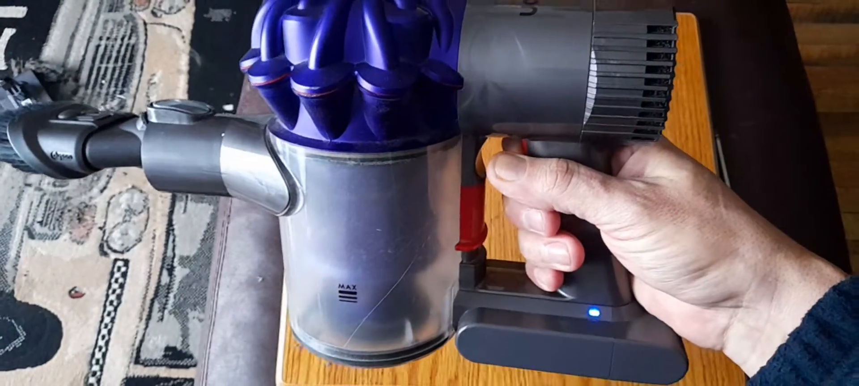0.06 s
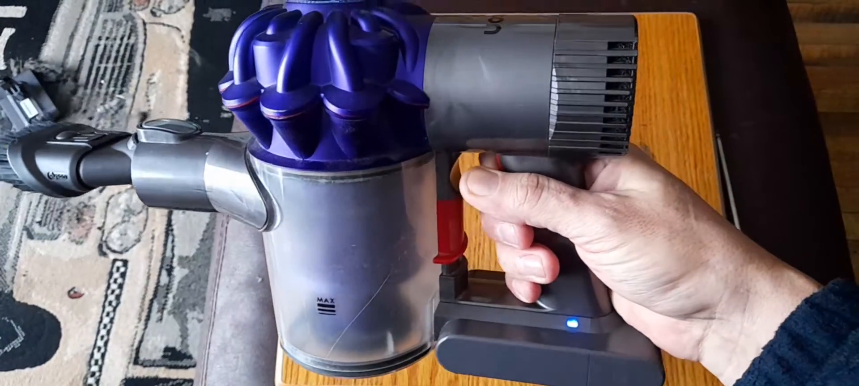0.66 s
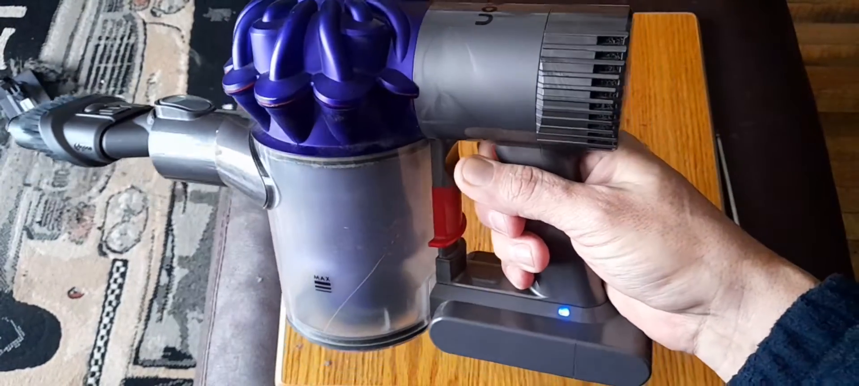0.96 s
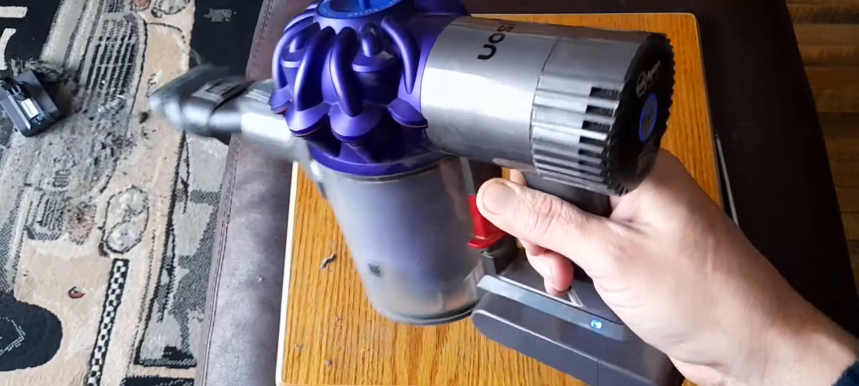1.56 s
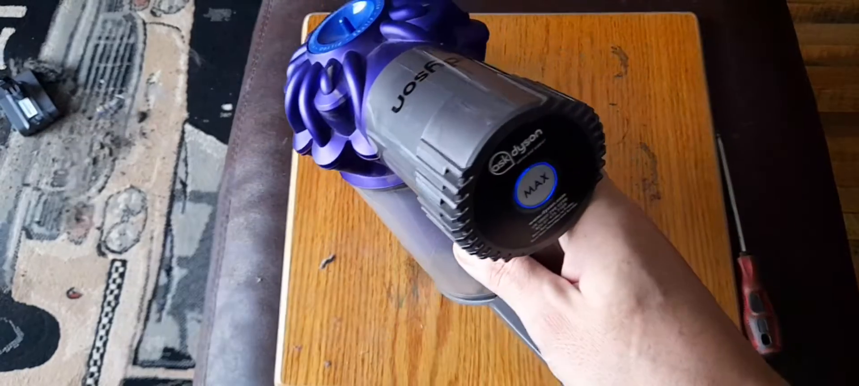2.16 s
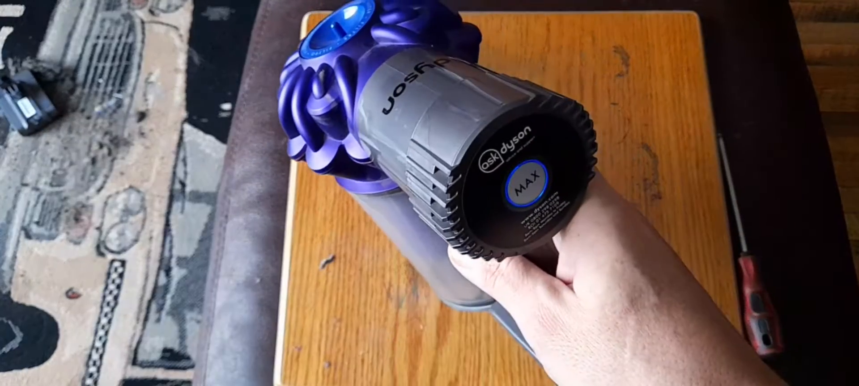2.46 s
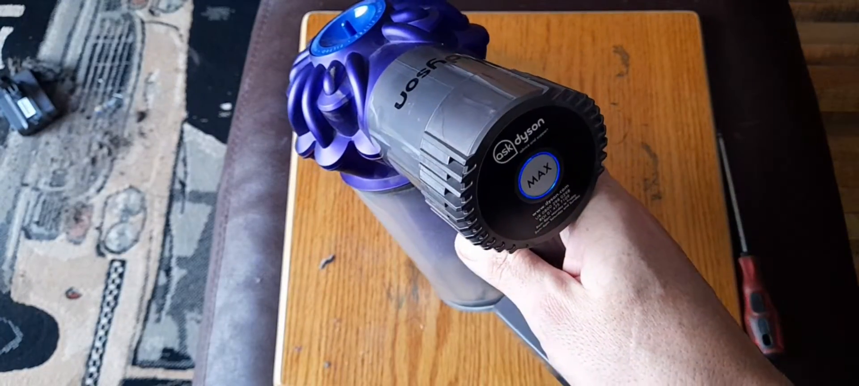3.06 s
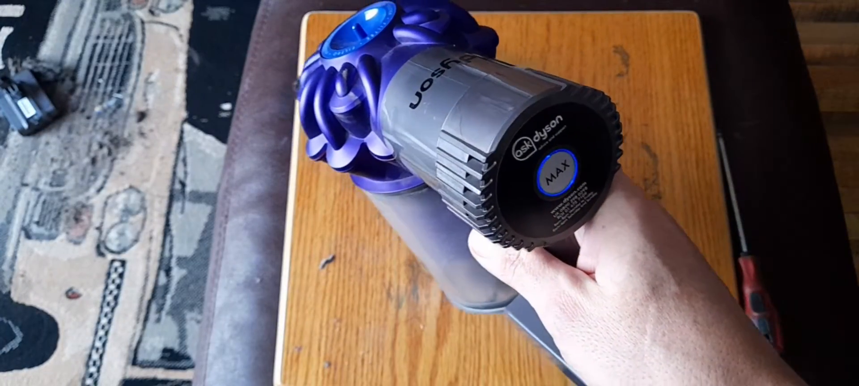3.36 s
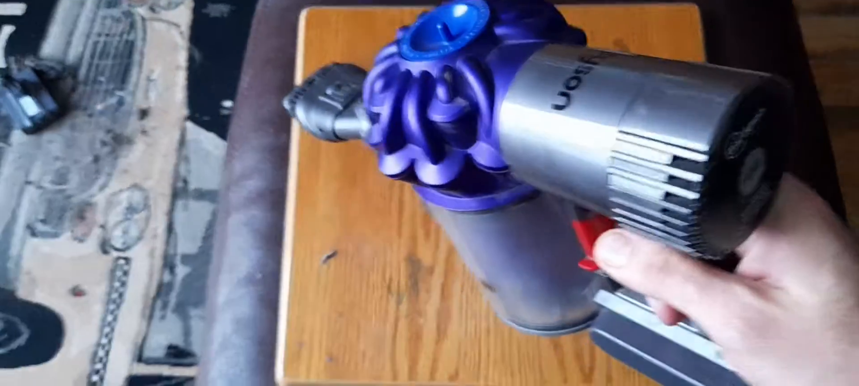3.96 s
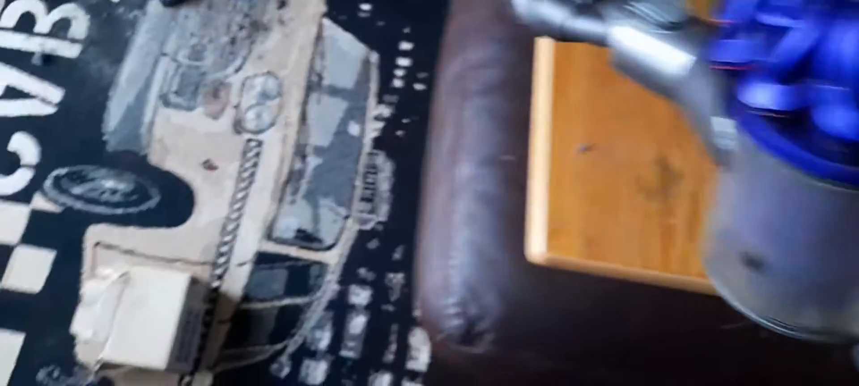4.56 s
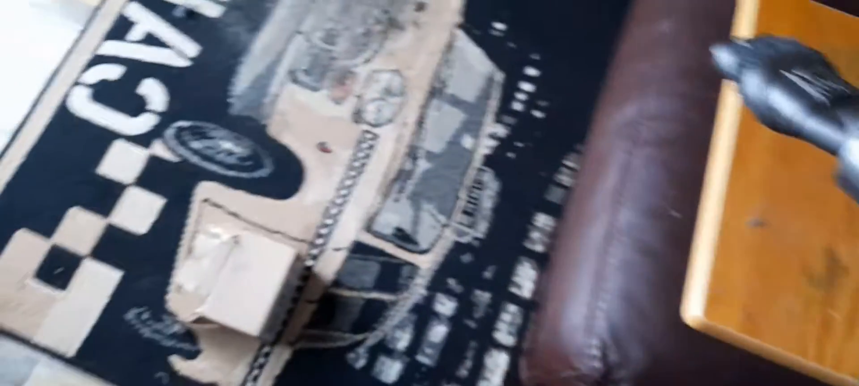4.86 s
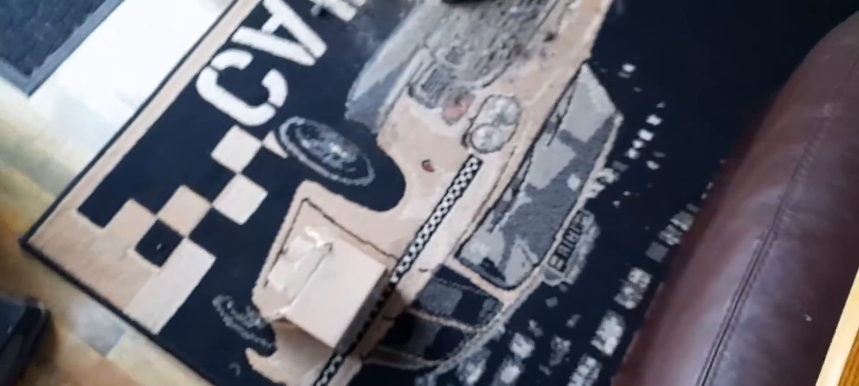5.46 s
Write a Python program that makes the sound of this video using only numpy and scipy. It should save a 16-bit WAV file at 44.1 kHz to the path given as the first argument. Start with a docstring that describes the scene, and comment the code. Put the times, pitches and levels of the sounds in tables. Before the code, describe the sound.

A handheld cordless vacuum runs close by with rushing air and a high whine, then switches off and spins down with small plastic knocks.

```python
"""Cordless vacuum coasting to rest

A handheld vacuum runs close by: turbulent air rushes, the fast motor whines at harmonics of its shaft
rate, and at first the exhaust buffets the right microphone. It is turned round and the trigger is let
go; drag and friction brake the rotor, with a falling tone and a short rattle. At last the magnet
catches the rotor, which rocks with a low buzz while the plastic body knocks."""
import sys
import numpy as np
from scipy import signal
from scipy.fft import rfft, irfft, next_fast_len
from scipy.io import wavfile
from scipy.ndimage import map_coordinates

SR = 44100
rng = np.random.default_rng(int(sys.argv[2]) if len(sys.argv) > 2 else 0)


def materialize(psi):
    """Save the field psi as 16-bit PCM at rate SR to the path in sys.argv[1].

    A 1-D psi becomes a single channel; in a 2-D psi each row is a channel.
    """
    bounded = np.clip(np.atleast_2d(psi).T, -1, 1)
    quanta = np.round(bounded * 32767).astype(np.int16)
    wavfile.write(sys.argv[1], SR, quanta)


N = 242814

RUN_HZ, RELEASE_S, CATCH_S = 1554, 3.614, 5.32  # full shaft speed, trigger let go, rotor caught

# Spectra of the duct roar, hollow bin, vent hiss, fine hiss and top fizz: frequency_hz, level_db
DUCT_SPECTRUM = [(30, -36.5), (80, -26), (160, -14.5), (300, -10.5), (480, -10), (720, -6.5), (1000, -5),
                 (1400, 0.5), (1900, 1), (2150, -3), (2400, -6), (2650, -10.5), (3400, -29.5),
                 (5700, -89.5)]
BIN_SPECTRUM = [(30, -16.5), (60, -17.5), (100, -10), (160, -6.5), (250, -2), (360, 1.5), (560, -6.5),
                (850, 1.5), (1050, -14.5), (1500, -29)]
VENT_SPECTRUM = [(1410, -46.5), (2400, -9), (3080, -1), (3420, -2.5), (3910, 0.5), (4300, -3), (5070, -1.5),
                 (5930, -4), (6000, -1.5), (7800, -38), (13200, -120)]
HISS_SPECTRUM = [(5200, -37.5), (6200, -3.5), (7000, -1), (8300, 0.9), (9800, 0.8), (11000, -1.5),
                 (12000, -7.5), (13000, -23), (15800, -33)]
FIZZ_SPECTRUM = [(10500, -28), (12000, -3), (14000, 1.5), (15800, -2)]
# Fine hiss at full flow: time_s, level_db
HISS_LEVEL = [(0, -32), (.5, -30.5), (1.15, -25.5), (1.45, -26.5), (1.77, -24), (1.89, -28.5), (2.2, -25.5),
              (3.27, -26), (3.6, -29.5)]
# Turning of the vacuum in the hand: time_s, angle_deg
HEADING = [(0, 3.5), (.7, 13.5), (1.45, 11), (1.7, 32), (2.05, 46), (2.7, 60), (3.3, 48.5), (3.6, 42.5)]
def airflow(speed):
    """Turbulent noise follows a power law of the flow, which lags behind the motor speed."""
    lag_s = 0.1
    keep = np.exp(-1 / (lag_s * SR))
    flow = 1 - signal.lfilter([1 - keep], [1, -keep], 1 - speed / RUN_HZ)
    octaves = np.log2(np.maximum(flow, 1e-3))  # each factor on this is dB lost as the flow halves
    hiss_db, = curves(HISS_LEVEL)
    hiss_dip_db = hiss_db - hiss_db.max()
    duct_db = -34.5 + 0.0823 * curves(HEADING)[0] + 14.5 * octaves
    duct_dip_db = duct_db - duct_db.max()
    vent_db = -27 + 0.54 * (hiss_dip_db + 2) + 16 * octaves
    duct = amp(duct_db) * turbulence(DUCT_SPECTRUM, ring=0.48, echo_db=-10)
    # the bin and the housing fade more slowly than the roar
    hollow = amp(-47 + .5 * duct_dip_db) * turbulence(BIN_SPECTRUM, ring=0.83, echo_db=-9)
    housing_modes = [(1855, 110, -2.5), (2850, 91, -3)]
    housing = unit(filtered(rng.standard_normal((2, N)), lambda hz: peaks(hz, housing_modes)))
    housing *= amp(-44.5 + .68 * duct_dip_db)
    vent = amp(vent_db) * turbulence(VENT_SPECTRUM, ring=.4, echo_db=-11)
    hiss = amp(hiss_db + 17.5 * octaves) * turbulence(HISS_SPECTRUM, ring=.1, echo_db=-9)
    fizz = amp(-30.5 + .37 * hiss_dip_db + 21 * octaves) * noise(FIZZ_SPECTRUM)
    return (duct + hollow + housing + vent + hiss + fizz) * amp(0.34 * wobble(25))


# Resonances of the bin and ducts: centre_hz, width_hz, level_db
CAVITY_MODES = [(533, 42, -0.5), (660, 31, 3.5), (800, 110, -1.5), (960, 70, -10.5), (1786, 110, -5.5),
                (1940, 80, -6), (2790, 110, -3), (2936, 70, -21), (3870, 150, -9.5), (4590, 200, 3),
                (5050, 250, -4)]
# Likeness of the air noise at the two microphones: frequency_hz, coherence
AIR_COHERENCE = [(60, 0.07), (99, 0.19), (160, 0.6), (270, 0.76), (450, 0.92), (740, 0.78), (1220, 0.75),
                 (2010, 0.81), (3330, 0.27), (5500, 0.43), (9080, -0.01), (15000, -0.12)]
# Balance of the air noise: frequency_hz, left_minus_right_db
AIR_BALANCE = [(60, 4), (110, -0.5), (200, 2), (380, -2), (700, 1.5), (1290, -1), (2380, -1.5),
               (4400, -1.5), (8120, 0.5), (15000, -5)]
def turbulence(spectrum, ring, echo_db):
    """Cavity resonance colours broadband noise, which is partly coherent at the two microphones."""
    def mid_side_response(hz):
        coherence = np.clip(along(AIR_COHERENCE, hz), -.95, .98)
        side_gain = np.tan(np.arccos(coherence) / 2)
        return resonant(hz, CAVITY_MODES, ring) * np.array([np.ones_like(hz), side_gain])

    source = reflected(noise(spectrum), echo_db, t60=0.099)
    mid, side = filtered(source, mid_side_response)
    pair = np.array([mid + side, mid - side])
    return filtered(pair, lambda hz: amp(np.outer([.5, -.5], along(AIR_BALANCE, hz)))) / np.std(mid)


# The shaft starts slightly fast and settles: time_s, excess_hz
OVERSPEED = [(0, 6), (1.35, 4.5), (1.8, 1.5), (2.35, .3), (3.2, 0)]
def shaft():
    """Air drag and constant bearing friction brake the released rotor; gives speed (Hz), angle (rad)."""
    friction_hz_per_s, drag_hz_per_s, drag_exponent = 188.4, 9324, 2.124
    speeds, step = np.linspace(RUN_HZ, 0, N, retstep=True)
    braking = friction_hz_per_s + drag_hz_per_s * (speeds / RUN_HZ) ** drag_exponent
    reached_s = RELEASE_S + np.cumsum(-step / braking)
    speed = np.interp(clock(), reached_s, speeds) + curves(OVERSPEED)[0]
    return speed, 2 * np.pi * np.cumsum(speed * (1 + .0003 * wobble(30))) / SR


# Pole-passing and blade-passing tones under power: time_s, left_db, right_db
POLE_LEVEL = [(0, -28.5, -48.5), (.55, -26, -33.5), (.85, -27.5, -32.5), (1.2, -24, -29.5),
              (1.52, -31.5, -33), (1.7, -22.5, -33.5), (1.87, -27.5, -30.5), (2.05, -27, -31),
              (2.4, -34, -33), (3.6, -29.5, -31.5)]
BLADE_LEVEL = [(0, -24.5, -27.5), (.45, -27, -47), (.85, -41, -39.5), (1.05, -38.5, -28.5),
               (1.32, -35.5, -28.5), (1.48, -18.5, -40), (1.73, -43.5, -22.5), (1.9, -20.5, -22),
               (2.12, -36, -27.5), (2.22, -25, -27.5), (2.9, -32, -28.5), (3.33, -32, -34.5),
               (3.45, -24.5, -36), (3.6, -18.5, -24)]
def whine(angle):
    """Periodic forcing by the shaft, four magnetic poles and seven blades radiates shaft harmonics."""
    heading_deg, = curves(HEADING)
    lead_rad = 0.16 * heading_deg  # turning shifts the phase between the microphones
    lines = tone(angle, -37 - .065 * heading_deg, .59, 0.26) * pan(3.8)
    lines += tone(4 * angle, 0, 0.7, 2.95 + lead_rad) * amp(curves(POLE_LEVEL))
    lines += tone(7 * angle, 0, 1, 3.1 + lead_rad) * amp(curves(BLADE_LEVEL))
    lines += tone(3 * angle, -56, 2.5, .73) + tone(6 * angle, -45, 3, 0.94)
    return lines * powered(fade_s=.042)


# Single hard puffs of the exhaust: start_s, level_db
JET_PUFFS = [(.004, -12.5), (.074, -13), (0.123, -10.5), (0.166, -12), (0.223, -12), (.299, -13),
             (0.396, -15), (.414, -9), (0.49, -15.5), (.537, -23), (0.606, -11), (.691, -6), (0.773, -11.5),
             (.85, -19.5), (0.891, -15), (0.928, -15.5), (1.099, -27.5), (1.294, -17)]
# Wind rumble on the microphone: frequency_hz, level_db
WIND_SPECTRUM = [(15, -49.5), (25, -28), (49, -5.5), (102, 5), (140, 2.5), (190, 1.5), (274, -5.5),
                 (420, -13.5), (600, -19), (900, -25.5), (2000, -71)]
def exhaust_jet():
    """Eddies carry pressure fluctuations onto the right microphone until the jet swings away."""
    leaves_s, gone_s = 0.38, 1.55
    t = clock()
    away = np.maximum(t - leaves_s, 0) / (gone_s - leaves_s)
    strength = amp(-26.5 - 18 * away ** 2) * np.clip((gone_s - t) / .08, 0, 1)
    eddies = np.zeros(N)
    for start_s, db in JET_PUFFS:
        # a passing eddy: one pull and one push, with rougher air around it
        width_s = .0011 * amp(rng.normal(0, 1.2))
        passage = (t - start_s - .003) / width_s
        eddies += amp(db + 2.5) * passage * np.exp(-passage ** 2 / 2)
        strength += swell(start_s + .005, db - 12.5, rise_s=.015, fall_s=.05)
    rumble = unit(noise(WIND_SPECTRUM) * amp(1.6 * wobble(90)))
    return (strength * rumble + np.outer([0, 1], eddies)) * pan(-30.5)


# Housing resonances met by the falling pole tone: centre_hz, width_hz, level_db
SWEPT_MODES = [(310, 52, -40.5), (456, 60, -52), (520, 40, -54.5), (640, 17, -54), (734, 27, -52.5),
               (908, 51, -51), (1020, 110, -55.5), (1320, 65, -62), (1660, 100, -54), (2450, 160, -41),
               (3720, 480, -33), (4380, 250, -40.5)]
def coasting(speed, angle):
    """Swept resonance: the harmonics fall together and the pole tone flares at each housing mode."""
    octaves = np.log2((speed + 1) / RUN_HZ)
    pole_db = 20 * np.log10(amp(-79) + peaks(4 * speed, SWEPT_MODES))
    lines = tone(4 * angle, pole_db, 1.6, .6)
    lines += tone(7 * angle, -36 + 9 * octaves, 3, 1) * np.clip((speed - 520) / 200, 0, 1)
    lines += tone(angle, -45 + 10.5 * octaves, 4, .3) * np.clip((speed - 200) / 70, 0, 1)
    # at low speed the tugs of the poles turn jerky and gain wavering overtones
    jerky = np.clip((135 - speed) / 35, 0, 1) * np.clip(speed / 80, 0, 1) ** 2
    for k in range(2, 5):
        lines += jerky * tone(k * (4 * angle + .3 * wobble(60)), -65 - 21 * np.log2(k / 2), 4, 1)
    lines *= (1 - powered(fade_s=.03)) * (clock() < CATCH_S)
    return reflected(lines, echo_db=-12.5, t60=.4) * pan(-3)


# Envelope of the rocking rotor's buzz: peak_s, level_db, rise_s, fall_s
BUZZ_ENVELOPE = (6, -43, 5.5, .28)
def rocking():
    """Nonlinear oscillation: held by the magnet, the rotor rocks faster and smoother as it settles."""
    start_hz, end_hz, settle_s = 66, 110, .06
    age = np.maximum(clock() - CATCH_S, 0)
    wide = np.exp(-age / settle_s)
    rate_hz = end_hz + (start_hz - end_hz) * wide
    phase = 2 * np.pi * np.cumsum(rate_hz * (1 + .04 * wobble(90))) / SR
    buzz = (1 - wide) * np.sin(phase)
    buzz += (0.36 + .7 * wide) * np.sin(2 * phase) + .5 * wide * np.sin(3 * phase)
    buzz += amp(-3) * sum(wobble(110) * np.sin(k * phase) / k ** 1.5 for k in range(2, 7))
    onset = 1 - np.exp(-age / 0.026)
    return swell(*BUZZ_ENVELOPE) * onset * amp(wobble(76)) * buzz * pan(-3.5)


# Chatter of loose plastic: frequency_hz, level_db
PLASTIC_SPECTRUM = [(710, -37), (1200, -3), (1320, -6.5), (1460, -29.5), (1590, -5), (2230, -10),
                    (2380, -7), (2650, -8), (3390, -6), (5730, -13.5), (9680, -15.5), (14400, -32),
                    (15500, -42)]
# Resonances of the plastic shell: centre_hz, width_hz, level_db
SHELL_MODES = [(2030, 65, 0), (2403, 41, 3.5), (3130, 120, -12), (4170, 54, -6), (6090, 39, -12),
               (7390, 64, -18), (8030, 44, -13), (9430, 87, -11)]
# Bursts of chatter: peak_s, level_db, rise_s, fall_s
RATTLE_BURSTS = [(4.97, -66, 0.32, .17), (4.995, -52, 0.034, 0.11), (5.092, -66, .015, 0.062),
                 (5.416, -62, 0.039, 0.084), (5.455, -62, 0.14, .22)]
def rattle(angle):
    """Forced vibration: loose plastic excites the shell modes, pulsing once a turn until the catch."""
    turn_fraction = angle / (2 * np.pi) % 1
    pulsing_db = np.where(clock() < CATCH_S, 7 * (.5 - turn_fraction), 0)
    shaken = noise(PLASTIC_SPECTRUM) * amp(3 * wobble(260) + pulsing_db)
    ringing = unit(filtered(shaken, lambda hz: resonant(hz, SHELL_MODES, ring=2.6)))
    return sum(swell(*burst) for burst in RATTLE_BURSTS) * ringing


# Light contacts on the body, and duller knocks as it is set down: start_s, level_db
BODY_TICKS = [(3.949, -46), (4.635, -49.5), (4.983, -56), (5.002, -60), (5.391, -55)]
BODY_KNOCKS = [(5.084, -65.5), (5.409, -46.5)]
# Colour of a knock: frequency_hz, level_db
KNOCK_SPECTRUM = [(180, -35), (300, -6), (415, -14), (499, -4), (639, -17), (701, -7), (1000, -16),
                  (1240, -11), (1940, -22), (2030, -31), (3770, -25), (4750, -44), (12000, -34),
                  (15600, -62), (22000, -120)]
def handling():
    """Impact noise: the body ticks and knocks as it is moved, and the battery bumps the table."""
    tick_spectrum = [(300, -14), (1500, -5), (3800, 7), (7000, -10), (15000, -10)]
    bump_spectrum = [(20, -10), (50, -11), (130, -3), (400, -5), (2000, -60)]
    ticks = impacts(BODY_TICKS, tick_spectrum, t60=0.011, tail_db=-22, tail_t60=.1)
    knocks = impacts(BODY_KNOCKS, KNOCK_SPECTRUM, t60=.06, tail_db=-2.5, tail_t60=0.54)
    bump = impacts([(3.95, -50)], bump_spectrum, t60=.1, tail_db=-6, tail_t60=.23)
    return ticks + knocks + bump


# Background of the quiet room: frequency_hz, level_db
ROOM_SPECTRUM = [(25, -27.5), (65, -19.5), (130, -4.5), (280, -4.5), (700, -14), (2000, -28.5), (2600, -13),
                 (3300, -26), (15000, -26.5)]
def room_tone():
    """Ambient noise, steady and uncorrelated between the microphones."""
    return amp(-75.5) * noise(ROOM_SPECTRUM)


def impacts(rows, spectrum, t60, tail_db, tail_t60):
    """Two-slope decay: each contact is a short crack with a weaker, longer ring of body and room."""
    out = np.zeros((2, N))
    for start_s, db in rows:
        age = clock() - start_s
        decay = amp(-60 * abs(age) / t60) + amp(tail_db - 60 * abs(age) / tail_t60)
        out += amp(db) * (age > 0) * decay * noise(spectrum)
    return out


def tone(phase, level_db, flutter_db, lead_rad):
    """Interference of shifting reflections makes a motor line waver differently at each microphone."""
    pair = []
    for side in (.5, -.5):
        gain = np.sqrt(2) * amp(level_db + flutter_db * wobble(15))
        pair.append(gain * np.sin(phase + side * lead_rad + 0.3 * wobble(7.7)))
    return np.array(pair)


def reflected(x, echo_db, t60):
    """Reflections from table and walls add a dense short echo that ripples the spectrum."""
    delay_s = np.arange(SR // 3) / SR
    tail = rng.standard_normal((2, len(delay_s))) * amp(-60 * delay_s / t60)
    return x + amp(echo_db) * signal.fftconvolve(x, tail / np.linalg.norm(tail[0]), axes=1)[:, :N]


def peaks(hz, modes):
    """Summed Lorentzian resonances, each given as centre_hz, width_hz, level_db."""
    return sum(amp(db) / (1 + (2 * (hz - centre) / width) ** 2) for centre, width, db in modes)


def resonant(hz, modes, ring):
    """A flat response plus resonances weighted by ring."""
    return 1 + ring * peaks(hz, modes)


def powered(fade_s):
    """1 while the trigger is held, fading to 0 as it is let go."""
    return np.clip((RELEASE_S - clock()) / fade_s + .5, 0, 1)


def swell(peak_s, db, rise_s, fall_s):
    """Exponential rise and decay, 20 dB down at rise_s before the peak and fall_s after."""
    age = clock() - peak_s
    return amp(db - 20 * np.maximum(-age / rise_s, age / fall_s))


def noise(spectrum):
    """Two uncorrelated coloured noises of rms 1."""
    return unit(filtered(rng.standard_normal((2, N)), lambda hz: amp(along(spectrum, hz))))


def filtered(x, response):
    """Zero-phase filtering by a gain that depends on frequency."""
    size = next_fast_len(N + SR // 2)
    return irfft(rfft(x, size) * response(np.fft.rfftfreq(size, 1 / SR)), size)[..., :N]


def wobble(rate_hz):
    """A smooth random curve with rate_hz knots a second."""
    knots = rng.standard_normal(int(N * rate_hz / SR) + 4)
    return map_coordinates(knots, [np.arange(N) * rate_hz / SR])


def pan(left_minus_right_db):
    """Constant-power left and right gains."""
    gains = amp(np.outer([.5, -.5], left_minus_right_db))
    return gains / np.sqrt(np.mean(gains ** 2, axis=0))


def along(points, hz):
    """Interpolation of (frequency_hz, value) points on a log axis."""
    knots_hz, values = np.transpose(sorted(map(tuple, points)))
    return np.interp(np.log(hz + 1), np.log(knots_hz + 1), values)


def curves(rows):
    """One value per sample for each column after the time."""
    times, *columns = np.transpose(rows)
    return [np.interp(clock(), times, column) for column in columns]


def clock():
    """Time of every sample in seconds."""
    return np.arange(N) / SR


def amp(db):
    """Decibels to gain."""
    return 10 ** (np.asarray(db) / 20)


def unit(x):
    """x at rms 1."""
    return x / np.sqrt(np.mean(x ** 2) + 1e-20)


def scene():
    """Superposition of air, motor and plastic body in a quiet room."""
    speed, angle = shaft()
    air = airflow(speed) + exhaust_jet()
    motor = whine(angle) + coasting(speed, angle) + rocking()
    body = (rattle(angle) + handling()) * pan(-4.5)
    return air + motor + body + room_tone()


def record(dry):
    """Band limiting: the microphone drops the deepest rumble and the highest treble."""
    low_hz, top_hz = 34, 15750

    def passband(hz):
        return np.clip((top_hz - hz) / 400 + .5, 0, 1) / np.sqrt(1 + (low_hz / (hz + 1)) ** 6)

    return filtered(dry, passband)


dry = scene()
out = record(dry)
materialize(out)
```